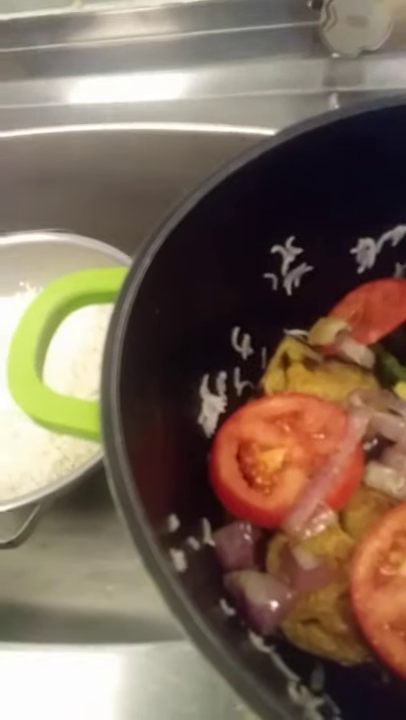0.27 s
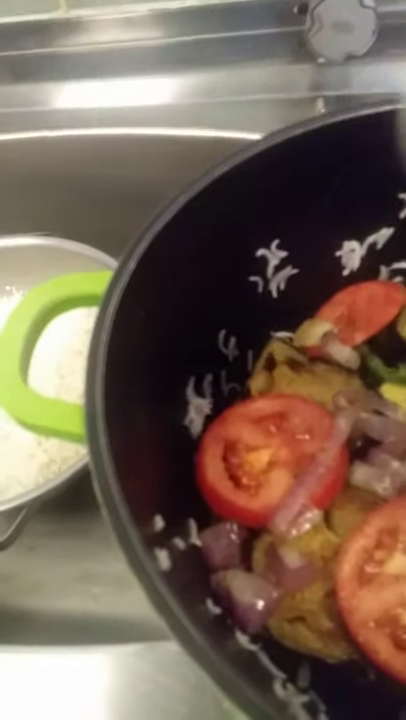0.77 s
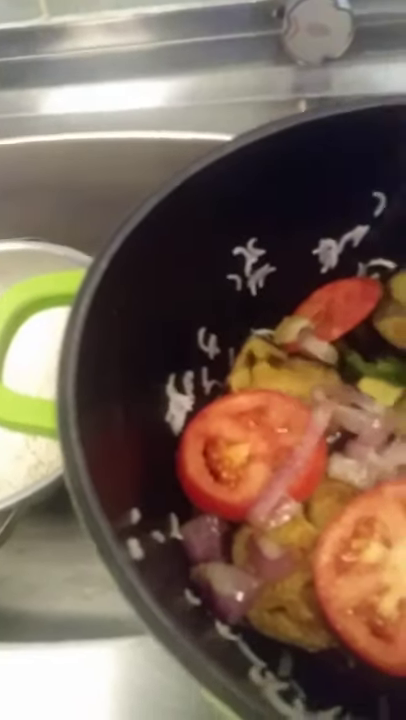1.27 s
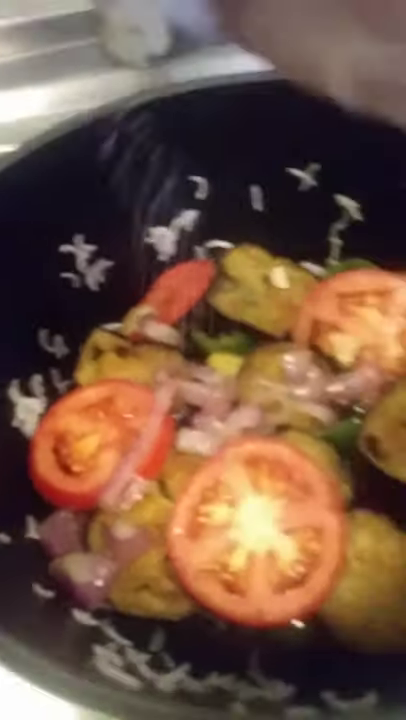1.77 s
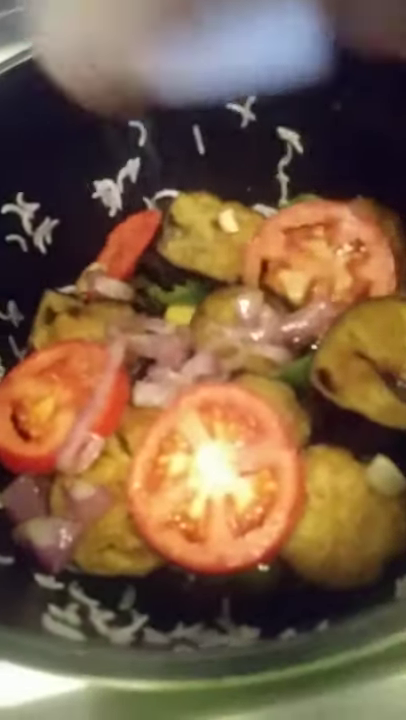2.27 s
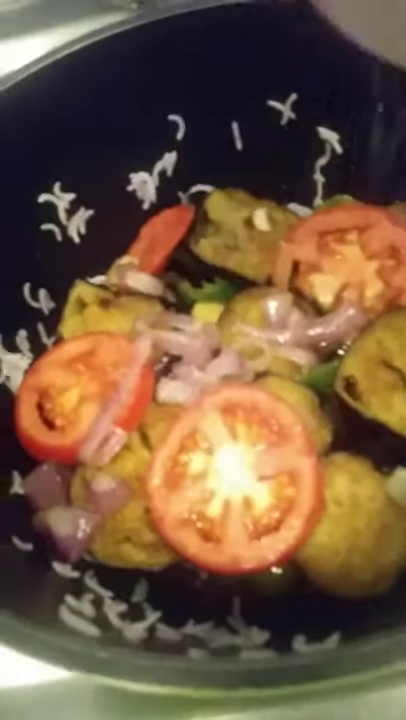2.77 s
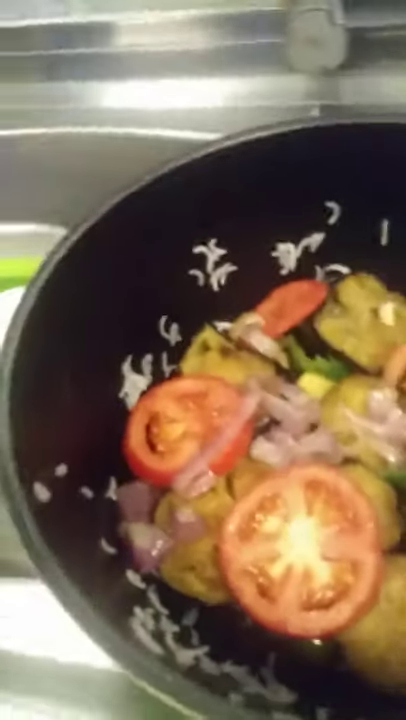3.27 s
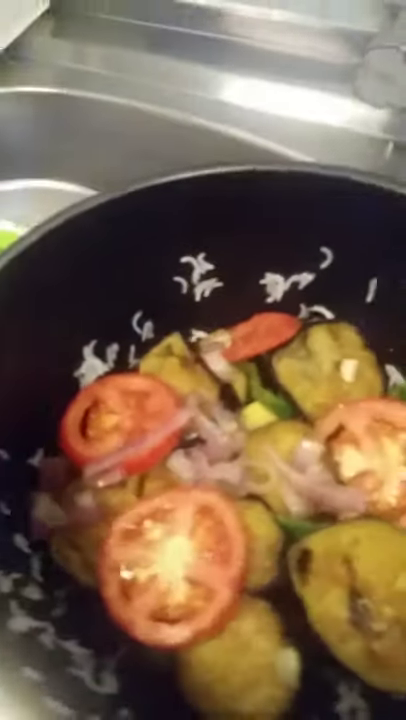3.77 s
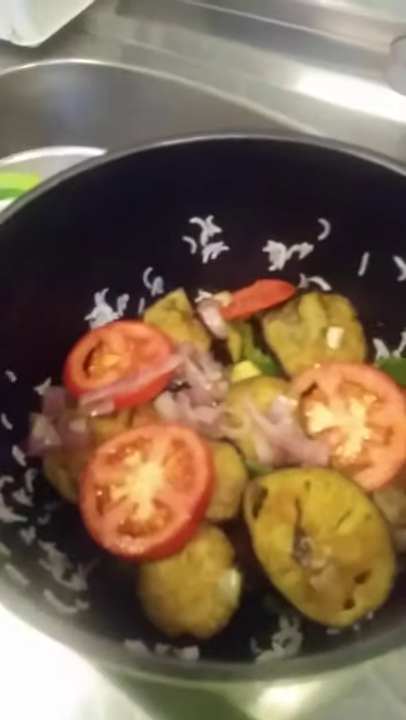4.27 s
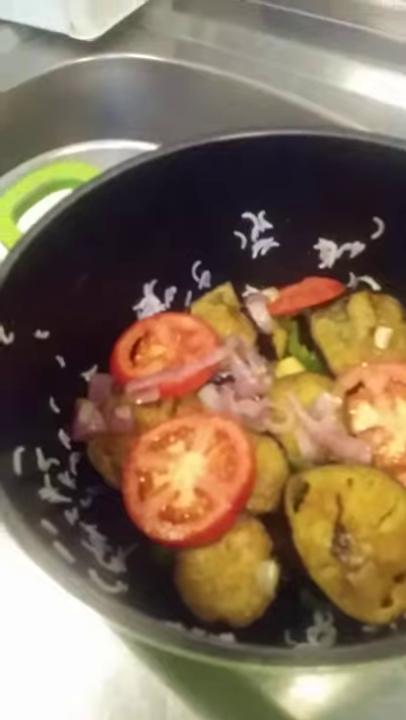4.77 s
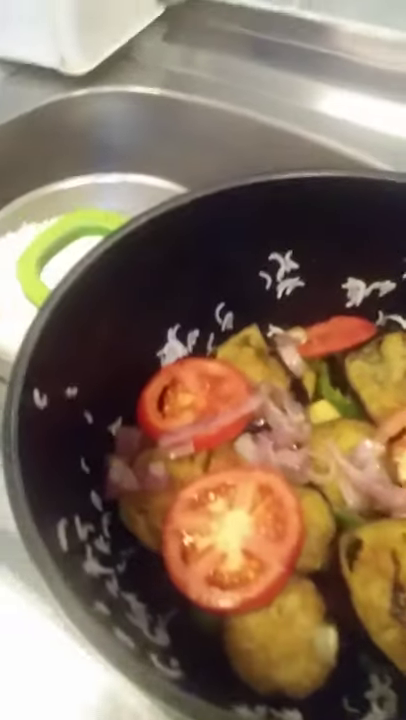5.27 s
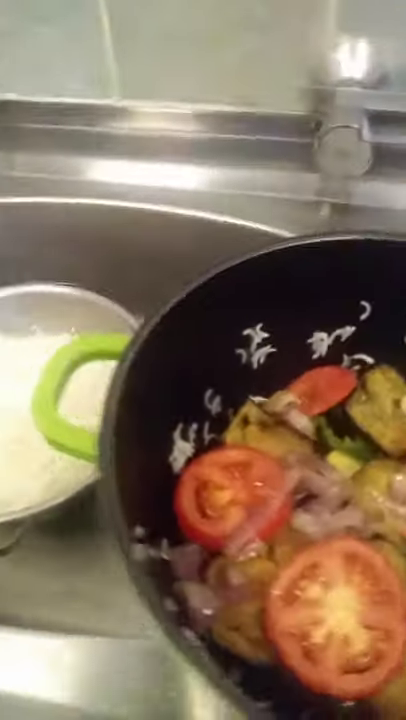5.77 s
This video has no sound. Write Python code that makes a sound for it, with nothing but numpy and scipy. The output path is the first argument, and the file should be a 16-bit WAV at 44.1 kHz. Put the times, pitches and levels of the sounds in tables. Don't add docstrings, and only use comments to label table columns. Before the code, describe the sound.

Coarse salt rattles in a plastic shaker in quick throws, then after a quiet pause a steel pan clashes loudly and rings in a tiled kitchen.

```python
import sys
import numpy as np
from scipy import signal
from scipy.fft import rfft, irfft
from scipy.io import wavfile
from scipy.ndimage import uniform_filter1d

SR = 44100
rng = np.random.default_rng(int(sys.argv[2]) if len(sys.argv) > 2 else 0)


def waveform_to_disk(signal):
    frames = np.transpose(np.atleast_2d(signal))
    scaled = np.clip(frames, -1, 1) * 32767
    samples = np.round(scaled).astype(np.int16)
    wavfile.write(sys.argv[1], SR, samples)


def ratio(d):
    e = np.asarray(d, float) / 20
    return 10 ** e


N = 264996
TIME = np.arange(N) / SR
PUFF = 4096


def level(x, db):
    return x * ratio(db) / np.sqrt(np.mean(x ** 2))


def curve(table, column=1):
    points = np.array(table)
    return np.interp(TIME, points[:, 0], points[:, column])


def butter(x, order, hz, kind):
    return signal.sosfilt(signal.butter(order, hz, kind, fs=SR, output="sos"), x)


def resonate(x, body):
    out = 0
    for k, (hz, width, db) in enumerate(body):
        out = out + (-1) ** k * ratio(db) * signal.lfilter(*signal.iirpeak(hz, hz / width, SR), x)
    return out


def walk(rate):
    hold = int(SR / rate)
    steps = np.repeat(rng.standard_normal(N // hold + 1), hold)
    return 1.07 * uniform_filter1d(uniform_filter1d(steps, hold), hold)[:N]


def bands(spectrum, shape):
    hz = np.maximum(np.fft.rfftfreq(N, 1 / SR), 1)
    points = np.array(spectrum)
    colour = ratio(np.interp(np.log(hz), np.log(points[:, 0]), points[:, 1]))
    noise = rfft(rng.standard_normal(N)) * colour
    place = 3 * np.log2(hz / 32)
    out = np.zeros(N)
    for k in range(29):
        window = np.cos(np.pi / 2 * np.clip(place - k, -1, 1)) ** 2
        out += irfft(noise * window, N) * shape(32 * 2 ** (k / 3))
    return out


def add(out, s, db, hz, t60):
    i = int(s * SR)
    t = np.arange(min(int(t60 * SR) + 8, N - i)) / SR
    out[i:i + len(t)] += ratio(db) * np.sin(2 * np.pi * hz * t) * 1000. ** (-t / t60)


def burst(db, low_hz, high_hz, t60):
    t = np.arange(PUFF) / SR
    puff = rng.standard_normal(PUFF) * 1000. ** (-t / t60)
    puff[0] = 2.7
    puff = butter(puff, 3, [low_hz, high_hz], "band")
    return ratio(db) * puff / np.abs(puff).max()


def grains(rate, scatter_db):
    when, size, sign = rng.random((3, N))
    sizes = ratio(-scatter_db * np.log(size + 1e-9))
    return level((when < rate / SR) * sizes * np.sign(sign - .5), 0)


def shaker():
    # (strike [s], length [s], rattle [dB], bright share re rattle [dB], jump at strike [dB])
    throws = [(0.0, 0.04, -47, -3.5, 2), (0.189, .034, -50, -1.5, 0), (0.358, 0.032, -50, -1.5, 8),
              (.56, 0.038, -49, -2, 1), (.778, 0.011, -38.5, -2.5, 4.5), (0.937, 0.026, -37, -3, 12.5),
              (1.145, 0.038, -38, -2, 8), (1.331, 0.05, -42, -2.5, 11), (1.534, 0.0054, -37, -2, 9),
              (1.729, 0.044, -50, -3, 10), (1.969, 0.027, -48, -4.5, 0), (2.182, 0.021, -45.5, -4.5, 6),
              (2.367, 0.025, -50, -3.5, -0.5), (2.59, 0.017, -44, -2.5, 5), (2.768, 0.022, -41.5, -3, 4.5)]
    # (time [s], peak level [dB], ring [Hz])
    lumps = [(0.0044, -28, 4040), (0.0283, -31, 2750), (0.3641, -38, 2640), (0.387, -35, 4780),
             (0.5586, -37, 4630), (0.7726, -30, 2750), (0.7836, -24, 2710), (0.9334, -23, 4830),
             (0.9423, -21, 4480), (0.9554, -23, 4550), (0.9624, -23, 2680), (0.9495, -27, 4900),
             (1.1458, -24, 4710), (1.1563, -25, 4590), (1.1707, -21, 4740), (1.186, -27, 4750),
             (1.3379, -29, 4760), (1.3744, -25, 4640), (1.3804, -25, 4740), (1.514, -37, 4720),
             (1.5254, -31, 5220), (1.5394, -21, 4250), (1.7335, -38, 4930), (2.371, -35, 2710),
             (2.5945, -32, 2610), (2.6154, -32, 2660), (2.7596, -33, 2630), (2.7674, -31, 2650),
             (2.7776, -30, 2800), (2.7854, -28, 2650)]
    # (time [s], peak level [dB], ring [Hz], t60 [s])
    blows = [(0.009, -49, 554, 0.054), (0.198, -46.5, 470, 0.035), (0.385, -58, 517, 0.048),
             (0.562, -55, 495, 0.064), (0.582, -56, 493, 0.096), (0.776, -52.5, 470, 0.054),
             (0.784, -46, 500, 0.12), (0.914, -47.5, 772, 0.1), (0.964, -32, 460, 0.024),
             (1.165, -35.5, 512, 0.027), (1.179, -45, 526, 0.054), (1.344, -48.5, 557, 0.13),
             (1.371, -41, 490, 0.096), (1.547, -40, 506, 0.06), (2.179, -51.5, 473, 0.048),
             (2.366, -57, 491, 0.15), (2.591, -50, 511, 0.13), (2.614, -50, 514, 0.049),
             (2.784, -42.5, 436, 0.041)]
    # (time [s], ring [Hz], lid level [dB])
    grip = [(0, 4770, -28), (.4, 4560, -31), (.8, 4590, -25.5), (.94, 4680, -16), (1.15, 4460, -23.5),
            (1.35, 4690, -13.5), (1.55, 4690, -25), (2.0, 4780, 4), (2.4, 5000, -39), (2.8, 4960, -43)]
    # (centre [Hz], width [Hz], gain [dB])
    shell_low = [(1577, 320, -9), (2090, 530, -8.5), (2656, 143, 4), (3380, 500, -4.5)]
    # (multiple of the bright ring [1], width [Hz], gain [dB])
    shell_high = [(0.888, 300, 0.5), (1.002, 260, 3), (1.08, 300, 1.5), (1.2, 500, -6.5), (1.4, 1060, -10)]
    gather_db_per_s, swell_db_per_s, settle_db_per_s = 454, 44.5, 362.5

    shell, rattle, thuds = np.zeros((3, N))
    ring_curve, lid_curve = curve(grip), curve(grip, 2)
    bunch = ratio(2.3 * walk(200))
    low = level(resonate(bunch * grains(2800, scatter_db=0.5), shell_low), -1.5)
    pelt = bunch * grains(5000, scatter_db=1.93)
    for s, length, db, bright_db, jump_db in throws:
        inside = slice(int(max(s - .06, 0) * SR), int((s + length + .1) * SR))
        since = TIME[inside] - s
        ring_hz = ring_curve[int(s * SR)]
        high_body = [(k * ring_hz, width, gain) for k, width, gain in shell_high]
        high = level(resonate(pelt[inside], high_body), -0.45)
        bright = min(ratio(bright_db), .98)
        throw_db = db - jump_db * (since < 0)
        throw_db = throw_db + gather_db_per_s * np.minimum(since, 0)
        throw_db = throw_db + swell_db_per_s * np.clip(since, 0, length)
        throw_db = throw_db - settle_db_per_s * np.maximum(since - length, 0)
        rattle[inside] = ratio(throw_db)
        shell[inside] = rattle[inside] * (bright * high + np.sqrt(1 - bright ** 2) * low[inside])
    for s, db, hz in lumps:
        i = int(s * SR)
        add(shell, s, db - 4.5, hz, .018)
        shell[i:][:PUFF] += burst(db - 10, 2200, 5600, .008)
        add(shell, s, db + lid_curve[i], 1420, .04)
    for s, db, hz, t60 in blows:
        add(thuds if hz < 700 else shell, s - .002, db + 1, hz, t60)
    thuds = butter(thuds, 2, [400, 620], "band")
    walls = butter(shell, 4, [750, 7000], "band")
    dust = rattle * level(resonate(rng.standard_normal(N), [(10000, 3100, 0)]), -26.0)
    return walls + dust + thuds


def pan():
    # (frequency [Hz], density [dB per Hz])
    clash = [(50, -39.5), (110, -1.5), (300, -6), (850, -7), (1140, -9), (1800, -9), (2800, -4.5),
             (4300, -5.5), (6000, -7.5), (7600, -15), (11500, -19.5), (13200, -27), (14800, -19),
             (15800, -21)]
    # (frequency [Hz], t60 [s])
    decay = np.array([(60, 1), (150, 0.6), (500, 0.88), (2000, 0.82), (5000, 0.77), (10000, 0.59),
                      (16000, 0.38)])
    # (frequency [Hz], level [dB], t60 [s])
    strong_modes = [(1416, -14, 0.79), (1814, -8, 0.62), (2406, -14, 0.86), (2794, -6, 0.83),
                    (3418, -6, 0.56), (3499, -6, 1.1), (3833, 0, 0.38), (4145, -10, 0.62), (4317, -8, 0.68),
                    (4500, -11, 0.77), (4807, -19, 1.4), (4985, -5, 0.37), (5399, -9, 0.33),
                    (5739, -14, 0.54), (6051, -11, 0.51), (6627, -16, 0.59), (7359, -13, 0.5),
                    (8344, -20, 0.53), (9512, -29, 0.67), (9733, -18, 0.38), (10010, -29, 0.94),
                    (10460, -20, 0.36), (10770, -19, 0.25), (11650, -18, 0.36)]
    # (frequency [Hz], level [dB], t60 [s])
    rim = [(428, -48, 3.5), (488, -57, 4.0), (808, -54, 3.5)]
    hit_s, rattle_s, pan_db, ring_db = 4.9297, 0.036, -25, -4.5

    since = TIME - hit_s
    start = np.clip(since / .003, 0, 1)

    def fade_s(hz):
        return np.interp(np.log(hz), np.log(decay[:, 0]), decay[:, 1])

    def wash_shape(hz):
        return start * ratio(2.0 * walk(60) - 60 * np.maximum(since - rattle_s, 0) / fade_s(hz))

    wash = bands(clash, wash_shape)
    modes = np.zeros(N)
    for hz, db, t60 in strong_modes:
        add(modes, hit_s, db, hz, min(t60, .8))
        add(modes, hit_s + 0.028, db - 17, 1.012 * hz, 1.3 * t60)
    for place, size, life in rng.random((90, 3)):
        hz = 600 * 16 ** place
        db = -13 - 8 * size - 9 * abs(np.log2(hz / 3800))
        add(modes, hit_s + 0.046 * life, db, hz, fade_s(hz) * (0.63 + .5 * life))
    ring = modes * np.clip(since / 0.056, 0, 1)

    thud = np.zeros(N)
    add(thud, hit_s + 0.0017, -31, 112, .3)
    add(thud, hit_s + 0.00395, -27, 330, .04)
    add(thud, hit_s + 0.00627, -26, 700, .03)
    thud[int(hit_s * SR):][:PUFF] += burst(-17, 3560, 4850, 0.13)
    for hz, db, t60 in rim:
        add(thud, hit_s, db, hz, t60)
    loud = (since > 0) & (since < .08)
    steel = wash / wash[loud].std() + ratio(ring_db) * ring / ring[loud].std()
    return ratio(pan_db) * steel + thud


def scraping():
    # (time [s], level [dB])
    drag_path = [
        (4.9, -79),
        (5.1, -43.5),
        (5.3, -57),
        (5.5, -56),
        (5.7, -52),
        (5.85, -51),
        (6.01, -47.5),
    ]
    # (time [s], level [dB])
    tray_path = [
        (4.59, -80),
        (4.6, -54.5),
        (4.72, -60.5),
        (4.92, -65.5),
        (4.95, -69),
    ]
    # (time [s], level [dB])
    pot_path = [
        (1.7, -98),
        (1.75, -52),
        (1.86, -61),
        (1.9, -70),
        (1.97, -50.5),
        (2.05, -63),
        (2.12, -61.5),
        (2.4, -79),
    ]
    # (centre [Hz], width [Hz], gain [dB])
    drag_body = [(173, 24, 4.5), (428, 150, -3.5), (822, 41, -1), (1437, 180, -0.5), (2365, 120, -5.5),
                 (2900, 530, -10.5), (4300, 520, -9.5), (5700, 1000, -16)]
    tray_body = [(1290, 30, 1), (1380, 44, -4), (2750, 540, -3), (4000, 1200, -9.5), (5000, 410, -8)]
    pot_body = [(170, 48, -4.5), (300, 61, -5.5), (730, 58, -3)]

    drag = level(resonate(rng.standard_normal(N), drag_body), 0) * ratio(curve(drag_path) + 1.0 * walk(25))
    drag = butter(drag, 3, 6200, "low")
    tray = level(resonate(grains(3300, scatter_db=-2.0), tray_body), 0) * ratio(curve(tray_path))
    pot = level(resonate(grains(1500, scatter_db=1.5), pot_body), 0) * ratio(curve(pot_path))
    return drag + tray + pot


def ticks():
    # (time [s], peak level [dB], ring [Hz], t60 [s])
    bumps = [
        (3.204, -38.5, 195, 0.02),
        (3.659, -29.5, 403, 0.0071),
        (4.740, -19, 170, 0.0068),
        (4.749, -19.5, 4000, 0.00096),
        (5.989, -30.5, 596, 0.015),
        (5.993, -31.5, 577, 0.036),
    ]
    # (time [s], peak level [dB], low edge [Hz], high edge [Hz], t60 [s])
    clicks = [(.489, -35, 250, 4300, 0.0061), (2.714, -40.5, 250, 2600, 0.006),
              (3.661, -41, 300, 2000, 0.0098), (3.697, -35.5, 2500, 5260, 0.011),
              (4.105, -36, 3270, 5400, 0.021), (4.107, -44.5, 3600, 5000, 0.22),
              (4.808, -49, 2500, 8000, 0.009), (5.520, -53, 5000, 8900, 0.0035),
              (5.557, -49, 5000, 8000, 0.0044), (5.597, -39.5, 393, 4420, 0.18),
              (5.988, -31, 1200, 7850, 0.0077), (5.992, -32, 800, 2900, 0.01)]
    out = np.zeros(N + PUFF)
    for bump in bumps:
        add(out[:N], *bump)
    for s, *click in clicks:
        out[int(s * SR):][:PUFF] += burst(*click)
    return out[:N]


def room(x):
    t60_s, echo_db = 0.35, -13
    t = TIME[:SR]
    tail = rng.standard_normal(SR) * np.clip(t / 0.0035, 0, 1) * 1000. ** (-t / t60_s)
    tail = signal.lfilter(*signal.butter(1, 6000, fs=SR), tail)
    return signal.fftconvolve(x, ratio(echo_db) * tail / np.linalg.norm(tail))[:N]


def kitchen():
    # (frequency [Hz], density [dB per Hz])
    hum = [(29, -33.5), (50, 6.5), (171, -6), (290, -5), (437, -5), (597, -7.5), (837, -11), (944, -10.5),
           (2140, -12), (3720, -7.5), (5600, -13.5), (8250, -31), (13000, -32), (15800, -29.5)]
    swell = .4 * walk(3.34)
    return level(bands(hum, lambda hz: ratio(swell + 2.9 * walk(15))), -56)


def gate():
    # (starts to close [s], open again [s], depth [dB], opening speed [dB/s])
    closures = [(0.139, 0.183, 12, 800), (0.277, 0.371, 8, 600), (.515, 0.562, 22, 1200),
                (0.679, 0.75, 14, 2998), (0.703, 0.757, 23, 1000), (1.864, 1.943, 15.5, 700),
                (2.122, 2.161, 7, 800), (2.296, 2.355, 25, 1000), (2.45, 2.57, 6.5, 600),
                (2.488, 2.552, 21, 800), (3.307, 3.37, 11.5, 995), (3.336, 3.665, 28, 3000),
                (3.64, 3.69, 16, 595.5), (3.685, 3.74, 4, 1000), (3.718, 3.835, 25.5, 4000),
                (3.8, 3.867, 15, 450), (3.844, 3.907, 28, 1200), (3.897, 3.97, 15, 398),
                (4.225, 4.319, 22, 1000), (4.298, 4.374, 18, 500), (4.34, 4.413, 7.5, 1003),
                (4.405, 4.602, 26, 3999), (4.55, 4.63, 6, 500)]
    # (time [s], gain reached [dB])
    peeks = [(3.492, -18.5), (3.556, -15.5), (3.644, -13), (4.472, -14), (4.502, -15.5)]
    close_db_per_s, peek_db_per_s = 900.5, 800
    shut_db = np.zeros(N)
    for close, reopen, depth_db, speed in closures:
        ramp = np.minimum(close_db_per_s * (TIME - close), speed * (reopen - TIME))
        shut_db = np.maximum(shut_db, np.minimum(ramp, depth_db))
    for s, db in peeks:
        shut_db = np.minimum(shut_db, peek_db_per_s * abs(TIME - s) - db)
    return ratio(-shut_db)


def scene():
    near = shaker()
    mono = near + room(near) + pan() + scraping() + ticks() + kitchen()
    return np.array([mono, mono])


def low_pass(x):
    return signal.sosfilt(signal.butter(12, 16480, fs=SR, output="sos"), x)


def record(dry):
    # (frequency [Hz], density [dB per Hz])
    hiss_colour = [(29, -35.5), (50, -8), (312, 11.5), (1530, -11), (1900, -3.5), (2660, -9), (4520, -25.5),
                   (8050, -9.5), (14000, -13), (15800, -15)]
    hiss = level(bands(hiss_colour, lambda hz: 1), -87)
    mix = dry * gate() + hiss
    mix = butter(mix, 3, 95, "high")
    mix = signal.sosfilt(signal.ellip(8, .2, 60, 15760, fs=SR, output="sos"), mix)
    return low_pass(mix)


dry = scene()
out = record(dry)
waveform_to_disk(out)
```